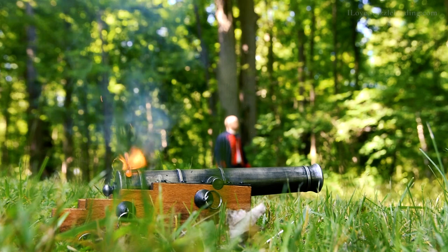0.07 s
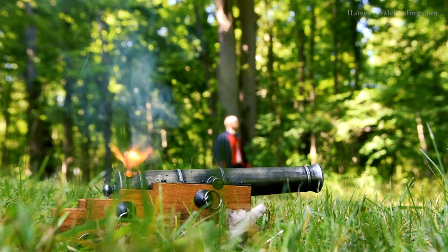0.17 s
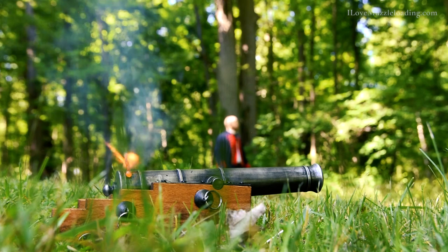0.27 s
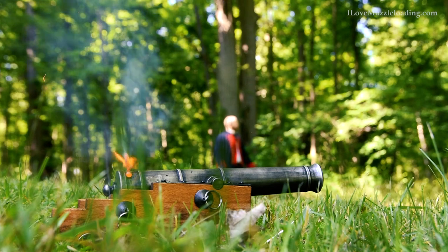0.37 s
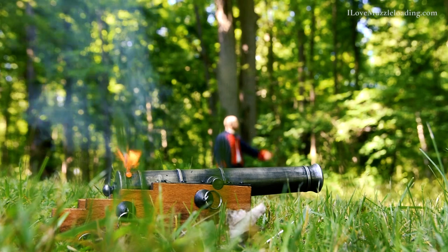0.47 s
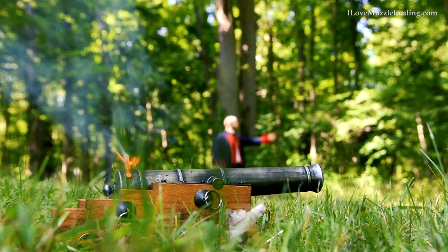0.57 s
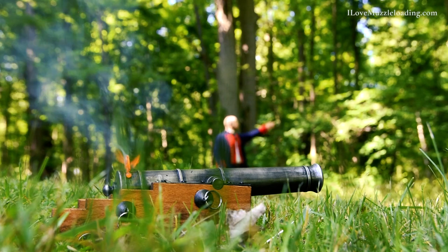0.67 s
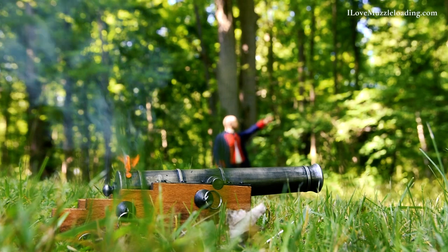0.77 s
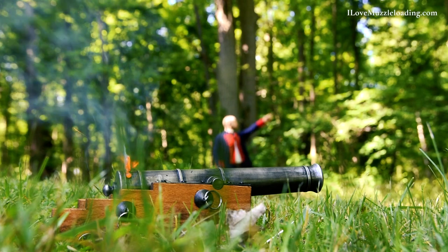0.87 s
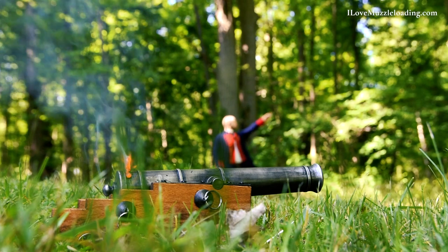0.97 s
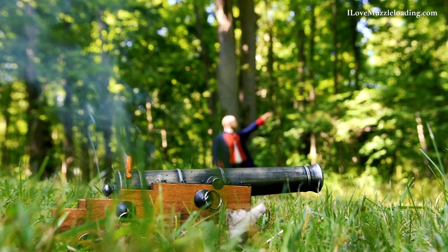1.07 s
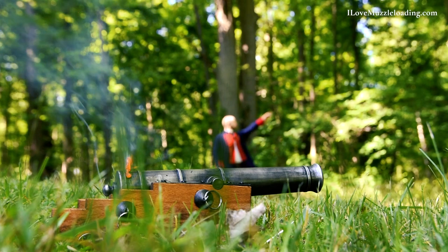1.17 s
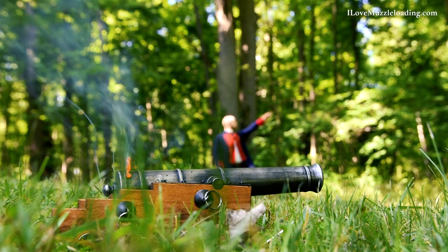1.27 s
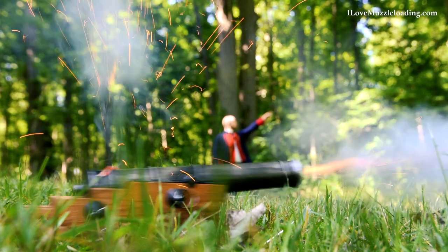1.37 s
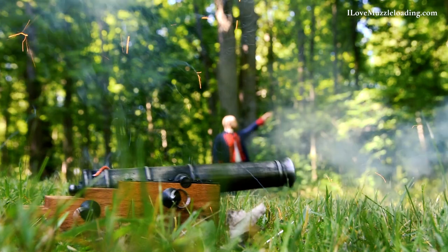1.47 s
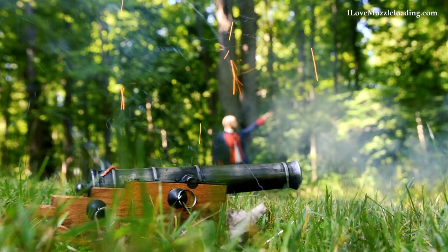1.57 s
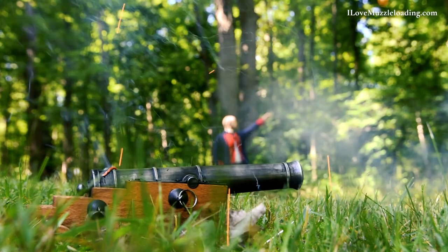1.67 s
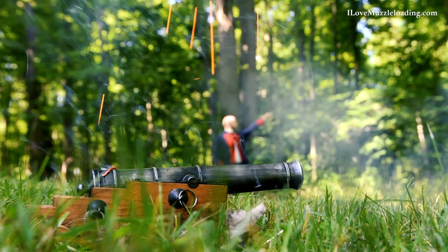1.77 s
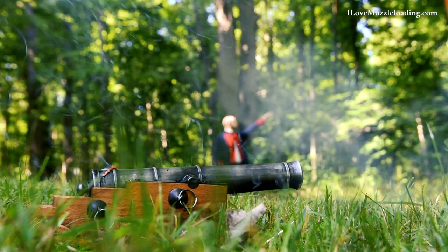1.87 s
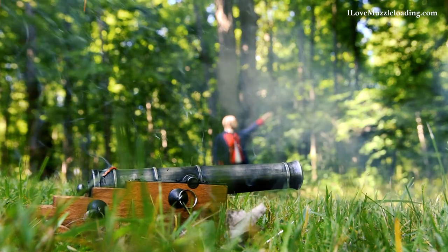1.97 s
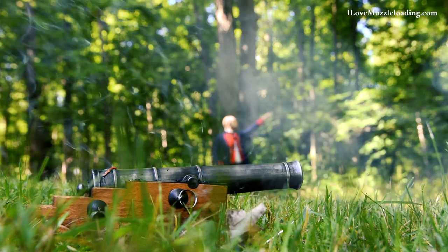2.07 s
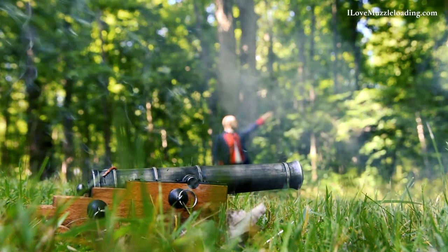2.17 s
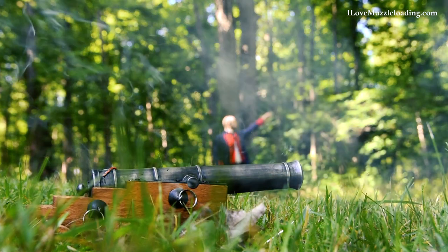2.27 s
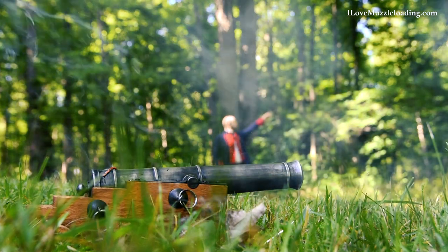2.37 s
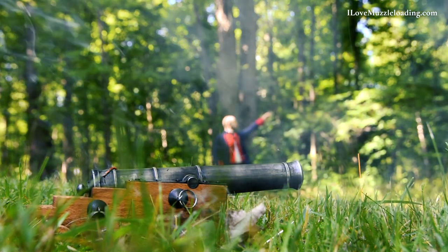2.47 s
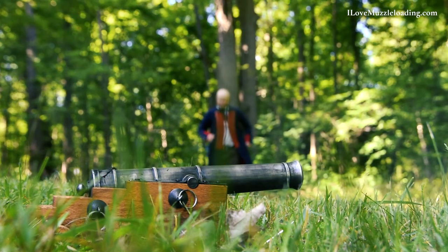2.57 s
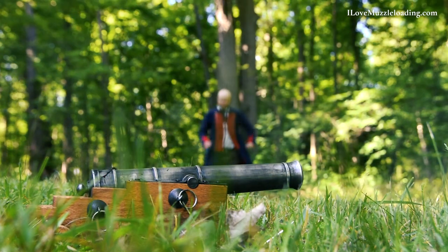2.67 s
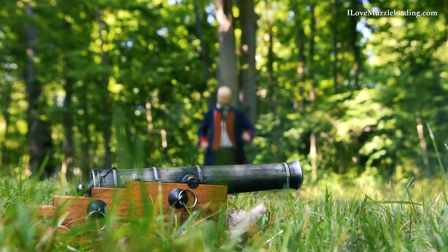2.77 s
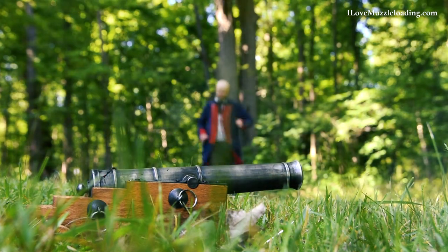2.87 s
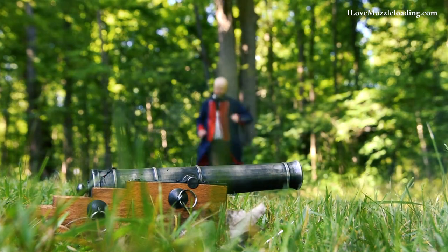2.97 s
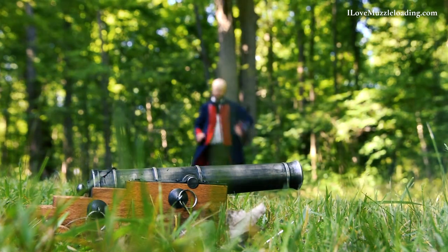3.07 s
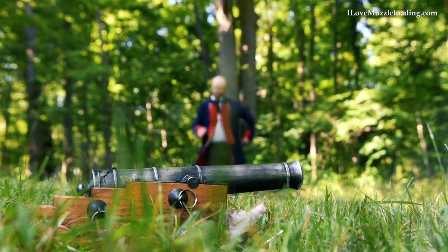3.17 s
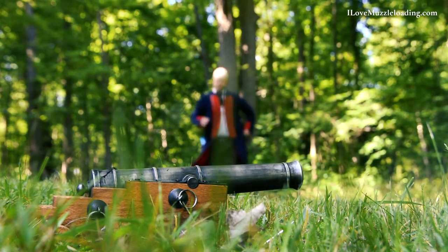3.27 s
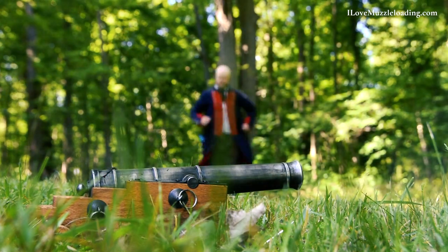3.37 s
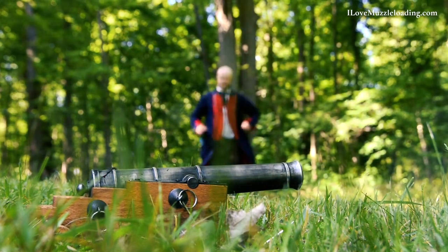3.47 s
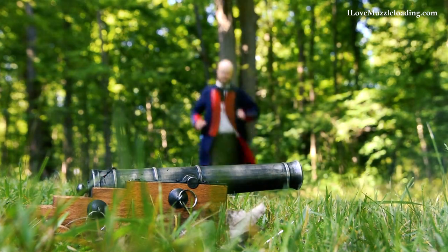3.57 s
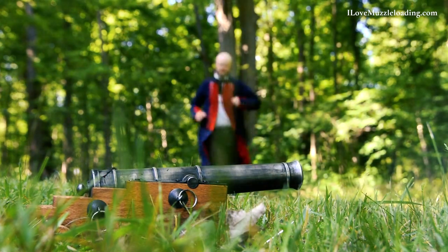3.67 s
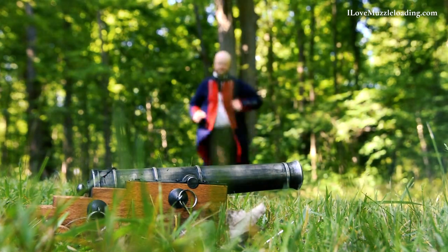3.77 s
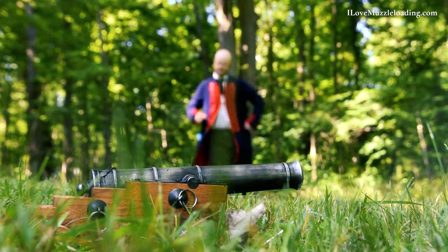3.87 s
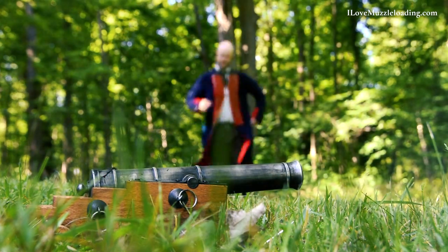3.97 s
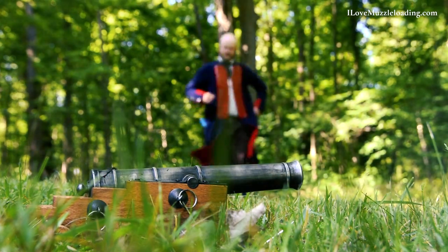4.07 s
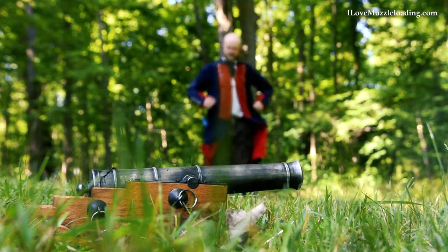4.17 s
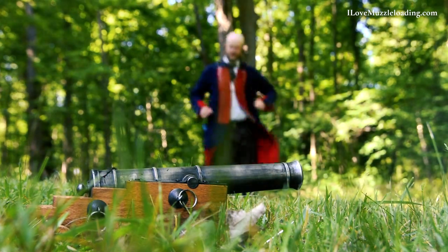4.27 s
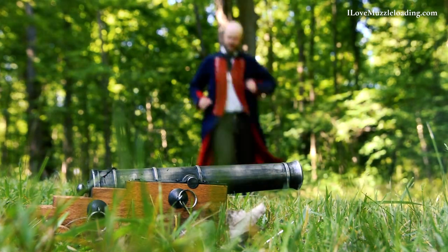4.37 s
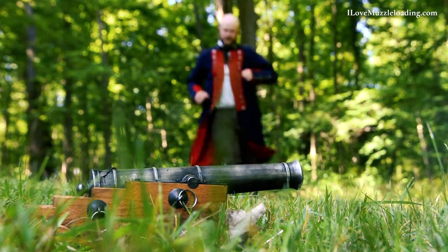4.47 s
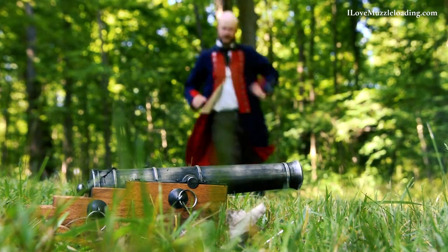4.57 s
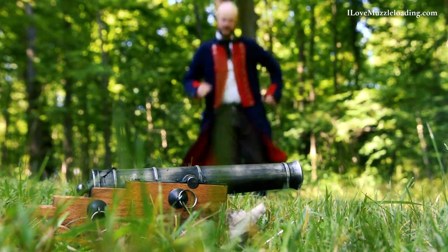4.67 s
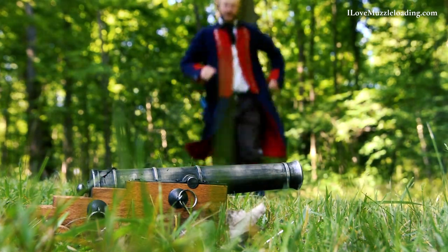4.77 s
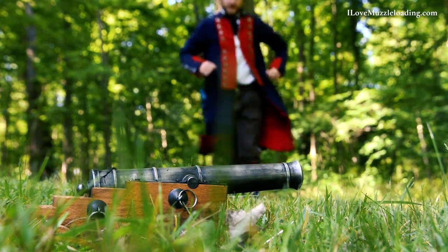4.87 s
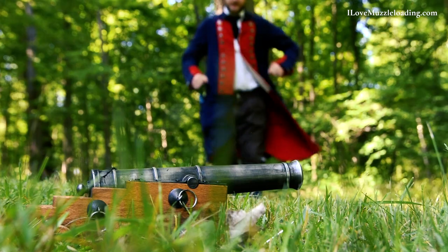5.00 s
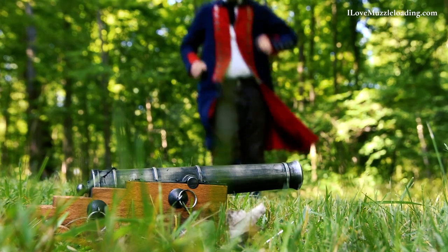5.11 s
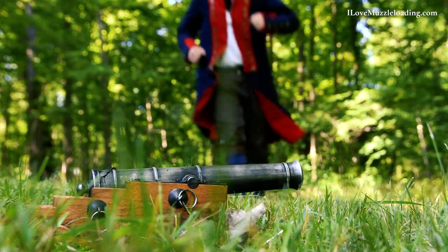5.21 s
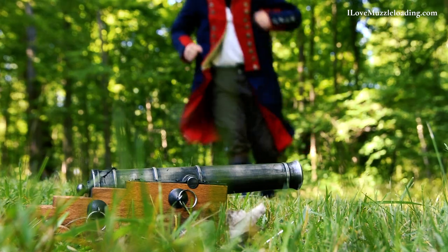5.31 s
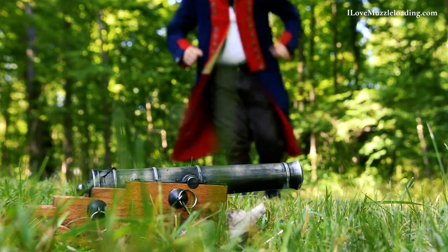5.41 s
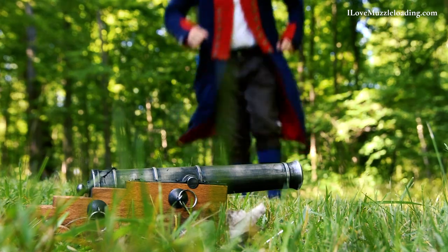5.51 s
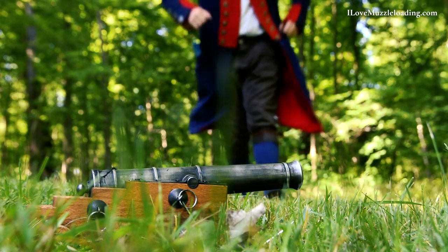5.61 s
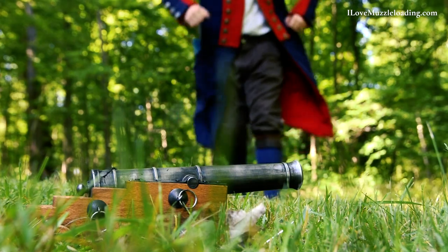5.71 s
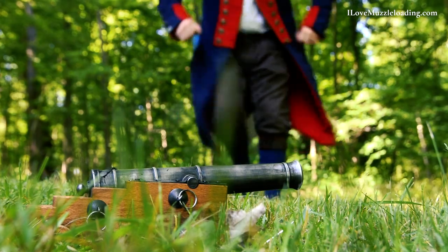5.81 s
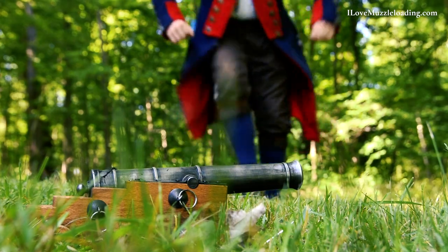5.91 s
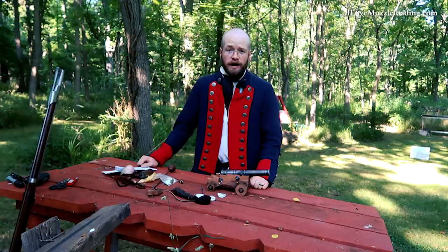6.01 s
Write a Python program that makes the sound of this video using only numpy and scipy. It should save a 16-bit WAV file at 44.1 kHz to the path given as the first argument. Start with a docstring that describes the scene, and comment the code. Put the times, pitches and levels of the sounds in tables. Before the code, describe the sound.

A small cannon fires one sharp overloading blast at a wood's edge, a fainter distant strike echoes, then someone jogs closer through rustling grass.

```python
"""A small black-powder cannon fires at the edge of a wood: pressure jumps and first sharp echoes that ring out, then
banded noise dying among the trunks. The ball strikes far off: a second noise echo, ringing with the target's modes.
The gunner stirs, then jogs through grass: pulsed resonances thud, grainy noise rustles and swishes, and noise
bursts through resonances snap like twigs. Birds sing in gliding sines over the coloured noise of the quiet wood."""
import sys
import numpy as np
from scipy import signal
from scipy.io import wavfile

SR = 44100
rng = np.random.default_rng(int(sys.argv[2]) if len(sys.argv) > 2 else 0)


def persist_wave(psi):
    """Save psi, clipped to +-1, as 16-bit WAV."""
    counts = np.round(np.clip(psi, -1, 1) * 32767).astype(np.int16)
    wavfile.write(sys.argv[1], SR, np.atleast_2d(counts).T)


N = 266672

# Spectrum of the wood at rest. Each row: frequency in Hz, relative density in dB per Hz.
AIR_SPECTRUM = [(26, -39), (45, -7), (153, 1), (242, -8), (950, -12.5), (1910, -18), (4020, -20.5),
                (4420, -24.5), (9310, -32), (14000, -48)]
AIR_DB = -75.5   # rms level before the final filters

# Bird notes sliding to a held pitch. Each row: start in seconds, length in seconds, first pitch in Hz,
# held pitch in Hz, slide in seconds, starting rms level in dB before wavering, fade over the note in dB.
WHISTLES = [(.06, 0.041, 2380, 2400, .04, -78, 5), (.11, .04, 1880, 1920, .04, -85, 2),
            (.15, .32, 2150, 2480, .04, -81.5, 10), (.3, .035, 1850, 2030, 0.023, -80, 3),
            (.55, 0.17, 2950, 2410, .09, -79.5, 0), (.84, 0.12, 2480, 2190, .05, -78.5, 7),
            (.95, .03, 2200, 2410, .025, -82, 1), (1.01, 0.081, 2240, 2260, .05, -81, -2),
            (1.085, 0.088, 2930, 2350, .05, -78.5, 2), (1.05, 0.19, 3750, 4080, .03, -86, 6),
            (1.24, .05, 2750, 2760, .04, -83, 6), (1.25, 0.059, 5100, 4300, 0.068, -82, 2),
            (1.368, 0.04, 4350, 3250, .022, -82, -9), (1.225, .025, 3900, 5000, .025, -85, 0),
            (2.09, .31, 4350, 4430, 0.062, -58.5, 26), (2.49, 0.089, 1900, 4390, .024, -66, -5),
            (2.545, .053, 4200, 4230, 0.029, -68, 2), (2.525, 0.027, 4350, 3500, 0.059, -62, 4),
            (3.99, .1, 3050, 3170, .02, -71.5, -1), (4.16, .03, 3100, 3340, .015, -70.5, 3.5),
            (4.54, 0.073, 2900, 3400, .06, -73, -3), (4.845, .06, 5300, 4600, .04, -73, 3.5),
            (4.975, 0.067, 3200, 3000, .1, -69, 0), (5.058, 0.027, 4720, 7550, .03, -55.5, 6),
            (5.09, .21, 4300, 4234, 0.052, -61.5, 22), (5.21, 0.054, 2480, 2600, .03, -72, -1),
            (5.3, 0.061, 2740, 3100, 0.034, -70.5, 0.5), (5.54, .105, 2790, 3400, .022, -72.5, -3)]
# Buzzy bird notes, rough in pitch. Each row: the same columns as the whistles.
BUZZES = [(2.488, 0.1, 4100, 7100, 0.028, -69.5, 8), (2.505, .093, 5500, 5900, .08, -71, 5),
          (5.09, .12, 7230, 7300, 0.087, -76, 20)]

# Spectra of cloth, crushed stalks and grass blades. Each row: frequency in Hz, relative density in dB per Hz.
CLOTH_SPECTRUM = [(15, -51), (25, -23.5), (86, 0.5), (179, 1), (422, -5.5), (515, -9), (628, -9),
                  (1300, -19.5), (1690, -46), (2860, -120)]
STALK_SPECTRUM = [(400, -18.5), (800, 0.5), (1300, -3), (2100, -5), (3500, -15), (7000, -37.5)]
GRASS_SPECTRUM = [(1060, -29.5), (1800, -1.5), (2490, -5.5), (2700, -2.5), (3980, -2.5), (4430, -5),
                  (5210, -4.5), (10700, -20.5), (15500, -41.5)]

# The gunner shifts and lifts an arm, then stands still.
# Each row: time in seconds, coat's dull rustle in dB, bright swish in dB.
STIR = [(.05, -85, -100), (.12, -73.5, -90), (.27, -70.5, -94), (.35, -79, -97), (.42, -60, -78.5),
        (.56, -67, -81), (.68, -60.5, -72.5), (.81, -54.5, -63.5), (.84, -60.5, -74.5), (.88, -59.5, -74),
        (.945, -81, -98), (.965, -65, -85), (1.06, -78, -100), (1.39, -78, -100)]
STIR_CRUNCH_DB = -12.5   # against the coat
# Steady rustle of the jog, from 2.59 s on
JOG_S, JOG_COAT_DB, JOG_CRUNCH_DB, JOG_SWISH_DB = 2.59, -59, -69.5, -73
# A leg sweeps or a toe drags through the grass.
# Each row: middle in seconds, length in seconds, swish in dB, coat in dB, crunch in dB.
SWINGS = [(2.595, 0.031, -73, -64, -75.5), (2.705, 0.028, -74, -66, -75), (3.056, 0.15, -70, -58.5, -80),
          (3.222, 0.07, -71, -64, -81), (3.407, 0.28, -68.5, -63, -78), (3.693, 0.057, -76, -67, -65),
          (3.789, 0.1, -67, -52, -68), (4.04, 0.032, -73, -60.5, -79), (4.219, 0.15, -74, -63.5, -83),
          (4.298, 0.068, -89, -66, -57), (4.399, 0.054, -74, -71, -61), (4.535, 0.15, -71.5, -53.5, -71),
          (4.634, 0.041, -71, -60, -60), (4.73, 0.025, -68.5, -69, -81), (4.987, 0.1, -69.5, -60, -81),
          (5.132, 0.037, -73, -64, -60.5), (5.504, 0.035, -66.5, -49.5, -75),
          (5.931, 0.14, -71.5, -60, -71)]
# Heel strikes. Each row: first touch in seconds, thud peak in dB, ground thud in Hz, roll to the main push
# in seconds, deep heave against the thud in dB, swish in dB, crunch in dB.
STEPS = [(2.774, -37, 77.6, .02, -1, -60.5, -62), (3.165, -38, 125.5, 0.017, -7, -54.5, -72),
         (3.574, -28, 70, .016, 2, -50.5, -58), (3.926, -38.5, 60, .021, -5.5, -56.5, -66),
         (4.336, -29, 102, .02, 1, -54, -54.5), (4.659, -34.5, 100, .023, -2, -58.5, -58.5),
         (5.075, -29, 101, .022, -2.5, -55.5, -56.5), (5.45, -38, 92, .022, -1, -54, -64),
         (5.844, -36, 141, .021, -5.5, -57, -64.5)]
FLATTEN_S, STEP_COAT_DB = 0.013, 7   # grass is loudest this long after first touch; coat against swish
# Seconds for 20 dB
SWISH_RISE_S, SWISH_FALL_S, CRUNCH_RISE_S, CRUNCH_FALL_S = 0.038, 0.035, 0.032, .12

# Twigs and stalks snapping. Each row: start in seconds, click peak in dB, ring in Hz,
# duller knock against the click in dB, decay constant of the fizz in milliseconds.
SNAPS = [(0.953, -66.5, 2300, 10.5, 1.5), (2.698, -52, 1200, 7.5, 1.6), (2.780, -45, 1000, -12, 1.8),
         (3.007, -61, 1000, 15, 1.8), (3.172, -43.5, 3130, -29, 11), (3.577, -31.5, 2700, -9.5, .7),
         (3.628, -41.5, 1200, -15, 6.9), (3.676, -47, 1480, 1.5, 2), (3.7005, -49, 1450, -15, 1.5),
         (3.9287, -48, 2010, 7, 2.05), (4.211, -50.5, 1300, -2, 1), (4.305, -45, 1510, -14, 3.1),
         (4.3393, -29, 2630, -17, 0.77), (4.408, -41.5, 1200, -15, .6), (4.6224, -46, 1710, 0, 3.3),
         (5.032, -41.5, 1400, 3.5, 1), (5.08, -30.5, 2750, -17, 0.51), (5.128, -43, 1300, -8, 4.5),
         (5.3702, -50.5, 2380, 4, 2.3), (5.439, -50, 3720, 3, 6.4), (5.6678, -35.5, 2260, -3, 0.62),
         (5.7575, -51, 1790, -13.5, 1.1), (5.851, -41.5, 2560, -7, .8), (5.8643, -49.5, 1700, 4, 2.1)]

REPORT_S, STRIKE_S = 1.4455, 1.8478   # starts of the two echoes
# Echo of the report in the wood. Each row: frequency in Hz, early level in dB per Hz, early t60 in seconds,
# late level against early in dB, late t60 in seconds.
REPORT_ECHO = [(30, -75.5, .1, -11, .7), (70, -57.5, .1, -12, 1.4), (150, -54, 0.11, -9, 1.1),
               (280, -59, 0.36, -8.5, 1.4), (574, -53, 0.67, -10, 2.62), (1000, -60, 0.41, -10.5, 2),
               (2200, -65.5, 0.69, -13.5, 2), (4500, -59, 0.57, -21.5, 1.6), (7340, -65, 0.46, -19.5, 1.3),
               (11000, -78.5, 0.41, -20, 0.85), (16060, -103, .2, -27, .4)]
# Echo of the ball's strike. Each row: the same columns as the report's echo.
STRIKE_ECHO = [(299, -88, 0.26, -19, 1.8), (540, -57, 0.11, -18, 1.9), (793, -53, 0.17, -20, 1.37),
               (1300, -69.5, 0.32, -13.5, 1.7), (2100, -62.5, 0.19, -13.5, 1.24),
               (2900, -63.5, 0.18, -12.5, 1.32), (4000, -76, 0.24, -2, 1.06), (5860, -66, 0.5, -13.5, 1.2),
               (7300, -73.5, 0.41, -15, 1.1), (9040, -81, 0.38, -13.5, 0.85),
               (16000, -100, 0.22, -12, 0.44)]
# Modes of the struck target. Each row: frequency in Hz, width in Hz, gain in dB, t60 of that gain in seconds.
STRIKE_MODES = [(797, 100, 2, 1.4), (1630, 150, 2, 4), (2880, 110, 10, 1.24)]

# Powder gas spitting from the vent before the blast: start, level at the blast before resonances, rise
VENT_S, VENT_DB, VENT_RISE_DB = 1.4365, -10, 25.5
# Pressure jumps of the muzzle blast and its first sharp echoes. Each row: start in seconds,
# peak in dB before dulling, ring in Hz, t60 in seconds, low-pass corner in Hz.
BLAST = [(1.4415, -17, 484, 0.0078, 2007), (1.4432, 14.5, 403, 0.0051, 6970),
         (1.4455, -6, 140, 0.028, 1500), (1.4534, -6.5, 602.4, 0.012, 3010),
         (1.4551, -8, 555.5, 0.01, 3013)]
# Dull echoes off near trunks. Each row: start in seconds, peak in dB before dulling.
SLAPS = [(1.4685, -22), (1.482, -14.5), (1.496, -18), (1.522, -23), (1.548, -19), (1.571, -26),
         (1.62, -17.5), (1.645, -29)]
SLAP_HZ, SLAP_T60_S, SLAP_DULL_HZ = 564, .018, 1400

START_S = .05   # silence until here
CLIP_TOP = 0.66   # largest amplitude the input passes
CUTOFF_HZ = 16000   # top of the treble


def amp(db):
    """Logarithmic level: decibels to amplitude gain."""
    return 10 ** (np.asarray(db) / 20)


def rms_one(x):
    """Normalised power: scale to rms 1."""
    return x / np.sqrt(np.mean(x ** 2) + 1e-20)


def at_hz(table, hz):
    """Interpolation on a logarithmic frequency axis: every further column of a table at one frequency."""
    f, *columns = np.transpose(table)
    return [np.interp(np.log(hz), np.log(f), c) for c in columns]


def drift(rate):
    """Low-passed chance: noise through a double pole at rate Hz, made every 20 samples, of spread 1."""
    r = np.exp(-40 * np.pi * rate / SR)
    noise = rng.standard_normal(N // 20 + 2002)
    slow = signal.lfilter([1], [1, -2 * r, r * r], noise)[2000:]   # drop the settling
    return np.interp(np.arange(N) / 20, np.arange(len(slow)), rms_one(slow))


def bands(source, step):
    """Filter bank: pairs (centre Hz, band), step octaves wide, dealing two sources in turn."""
    edges = 22 * 2 ** np.arange(0, 9.7, step)
    for k, (low, high) in enumerate(zip(edges, edges[1:])):
        band_pass = signal.butter(3, [low, high], "band", fs=SR, output="sos")
        yield np.sqrt(low * high), signal.sosfilt(band_pass, source[k % 2])


def ring(x, hz, width_hz):
    """Damped resonance: two poles, whose width sets the decay, with gain 1 on top."""
    r = np.exp(-np.pi * width_hz / SR)
    poles = [1, -2 * r * np.cos(2 * np.pi * hz / SR), r * r]
    return signal.lfilter([(1 - r * r) / 2, 0, (r * r - 1) / 2], poles, x)


def add(out, s, x):
    """Superposition: mix x into out at time s."""
    i = round(s * SR)
    out[i:i + len(x)] += x[:N - i]


def peaks(s, db, rise_s, fall_s):
    """Exponential rise and decay: the largest gain of peaks at times s, 20 dB in each span."""
    since = np.arange(N) / SR - np.array(s)[:, None]
    fall_db = 20 * np.maximum(-since / rise_s, since / fall_s)
    return amp(np.array(db)[:, None] - fall_db).max(axis=0)


def grainy(spectrum, per_s, spread_db, patchy_db):
    """Shot noise on steady noise: clicks of uneven size, coloured in flickering bands; rms 1."""
    sizes = amp(spread_db * np.minimum(rng.exponential(1, (2, N)), 4))
    grains = (rng.random((2, N)) < per_s / SR) * sizes
    source = rng.standard_normal((2, N)) * (1 + grains)
    together = drift(11)   # flicker common to all bands
    total = np.zeros(N)
    for hz, band in bands(source, step=.5):
        flicker_db = patchy_db * (together + drift(14))
        total += band * amp(at_hz(spectrum, hz)[0] + flicker_db)
    return rms_one(total)


def air():
    """Broadband ambience: noise shaped by the spectrum of the resting wood, its bands flickering."""
    return amp(AIR_DB) * grainy(AIR_SPECTRUM, 0, spread_db=0, patchy_db=3.0)


def sing(notes, waver_hz):
    """Frequency modulation: soft-ended sines ease into their held pitch and tremble by chance."""
    out, tremble = np.zeros(N), waver_hz * drift(250)
    for s, length, first_hz, held_hz, slide, db, fade_db in notes:
        t = np.arange(0, length, 1 / SR)
        ends = np.clip(np.minimum(t, length - t) / 0.0074, 0, 1)
        glide = np.sin(np.pi / 2 * np.minimum(t / slide, 1))
        pitch = first_hz + (held_hz - first_hz) * glide + tremble[((s + t) * SR).astype(int)]
        tone = np.sqrt(2) * np.sin(2 * np.pi * np.cumsum(pitch) / SR)
        add(out, s, ends * amp(db - fade_db * t / length) * tone)
    return out


def birds():
    """Diffuse reverberation: whistles and buzzes, wavering in level, blurred by an echo from the trees."""
    notes = sing(WHISTLES, waver_hz=42) + sing(BUZZES, waver_hz=260)
    notes = notes * amp(3.0 * drift(40))
    trees = rng.standard_normal(SR // 3) * amp(-38 - 180 * np.arange(SR // 3) / SR)
    return notes + signal.fftconvolve(notes, trees)[:N]


def rustle():
    """Friction noise: cloth rubs dully, stalks crunch, blades hiss and tick with stirs, leg sweeps and footfalls."""
    t = np.arange(N) / SR
    jog = t > JOG_S
    s, coat_db, swish_db = np.transpose(STIR)
    coat_db, swish_db = np.interp(t, s, coat_db), np.interp(t, s, swish_db)

    bright, dull, crunch = np.zeros((3, N))
    for s, length, sweep_db, sweep_coat_db, drag_db in SWINGS:
        arch = np.cos(np.pi * np.clip((t - s) / length, -.5, .5))
        bright += amp(sweep_db) * arch
        dull += amp(sweep_coat_db) * arch
        crunch += amp(drag_db) * arch

    s, *_, tread_db, crush_db = np.transpose(STEPS)
    tread = peaks(s + FLATTEN_S, tread_db, SWISH_RISE_S, SWISH_FALL_S)
    crush = peaks(s + FLATTEN_S, crush_db, CRUNCH_RISE_S, CRUNCH_FALL_S)
    dull += amp(np.where(jog, JOG_COAT_DB, coat_db)) + amp(STEP_COAT_DB) * tread
    crunch += amp(np.where(jog, JOG_CRUNCH_DB, coat_db + STIR_CRUNCH_DB)) + crush
    bright += amp(np.where(jog, JOG_SWISH_DB, swish_db)) + tread

    cloth = dull * grainy(CLOTH_SPECTRUM, 170, spread_db=-1.5, patchy_db=1.98)
    stalks = crunch * grainy(STALK_SPECTRUM, 150, spread_db=7.0, patchy_db=2.05)
    grass = bright * grainy(GRASS_SPECTRUM, 600, spread_db=5, patchy_db=1.37)
    return cloth + stalks + grass


def snaps():
    """Impulse excitation: a click with a short fizz rings a broad resonance; a duller knock follows."""
    out, t = np.zeros(N), np.arange(1200) / SR
    for s, db, hz, knock_db, ms in SNAPS:
        noise = rng.standard_normal(1200)
        burst = (noise + (t == 0) * 2.2 / ms) * np.exp(-t * 1000 / ms)
        tick = ring(ring(ring(burst, hz, 0.58 * hz), hz, 0.91 * hz), hz, 1.6 * hz)
        knock = ring(ring(noise * t * np.exp(-t / 0.0033), 290, 300), 395, 500)
        add(out, s, amp(db) * tick / np.abs(tick).max())
        add(out, s, amp(db + knock_db) * knock / np.abs(knock).max())
    return out


def steps():
    """Forced vibration: soft pushes of the rolling foot lead to the main one; the turf shakes and heaves."""
    out, n = np.zeros(N), round(.15 * SR)
    for s, db, hz, roll, heave_db, *_ in STEPS:
        main = np.arange(n) == round(roll * SR)
        pushes = np.zeros(n)
        places = (rng.random(5) * roll * SR).astype(int)
        pushes[places] = (0.34 + .5 * rng.random(5)) * [1, -1, 1, -1, -1]
        pushes = signal.lfilter(*signal.butter(2, 420, fs=SR), pushes + main)   # grass cushions the contact
        thud = ring(ring(pushes, hz, 1.05 * hz), hz, 1.45 * hz)
        thud += 0.36 * ring(ring(pushes, 151, 180), 204, 260)
        heave = ring(signal.lfilter(*signal.butter(2, 110, fs=SR), main), 56.5, 39)
        add(out, s, amp(db) * (thud / np.abs(thud).max() + amp(heave_db) * heave / np.abs(heave).max()))
    return out


def wood_echo(s, table, lumpy_db, gather_s):
    """Multiple scattering: trunk echoes gather and merge to noise; each band dies fast, then slowly."""
    out, t = np.zeros(N), np.arange(2 * SR) / SR
    white = rng.standard_normal((2, len(t))) * np.sqrt(SR / 2)   # 0 dB per Hz
    white *= amp(lumpy_db * drift(60)[:len(t)])
    for hz, band in bands(white, step=1 / 5):
        db, early, late_db, late = at_hz(table, hz)
        db -= 24 * max(np.log2(table[0][0] / hz), 0)   # 24 dB per octave below the first row
        gather = np.minimum(t / (2 / hz + gather_s), 1)
        decay = amp(db - 60 * t / early) + amp(db + late_db - 60 * t / late)
        add(out, s, band * gather * decay)
    return out


def strike():
    """Modal resonance: the ball's hit and its first echoes carry the ring of the target."""
    echo = wood_echo(STRIKE_S, STRIKE_ECHO, lumpy_db=1.06, gather_s=.0004)
    since = np.maximum(np.arange(N) / SR - STRIKE_S, 0)
    out = echo.copy()
    for hz, width_hz, db, t60 in STRIKE_MODES:
        out += amp(db - 60 * since / t60) * ring(echo, hz, width_hz)
    return out


def report_echo():
    """Reverberant decay: the report of the cannon dies among the trunks."""
    return wood_echo(REPORT_S, REPORT_ECHO, lumpy_db=1.0, gather_s=0.0098)


def blast():
    """Sudden gas expansion: vent hiss swells to the blast; ringing pressure jumps, sharp and dull echoes follow."""
    out, t = np.zeros(N), np.arange(round(.03 * SR)) / SR
    late = t - (BLAST[1][0] - VENT_S)   # time from the main jump
    swell_db = np.where(late < 0, -VENT_RISE_DB * (late / late[0]) ** 2, -1600 * late)
    hiss = ring(ring(rng.standard_normal(len(t)), 5500, 7000), 4500, 11000)
    add(out, VENT_S, hiss * amp(VENT_DB + swell_db))
    slaps = [(s, db, SLAP_HZ, SLAP_T60_S, SLAP_DULL_HZ) for s, db in SLAPS]
    for s, db, hz, t60, dull_hz in list(BLAST) + slaps:
        pulse = np.cos(2 * np.pi * hz * t) * amp(db - 60 * t / t60)
        add(out, s, signal.lfilter(*signal.butter(1, dull_hz, fs=SR), pulse))
    return out


def scene():
    """Linear superposition: all sources over the quiet of the wood, in one channel."""
    gunner = rustle() + steps() + snaps()
    bangs = strike() + report_echo() + blast()
    return (air() + birds() + gunner + bangs)[None]


def record(dry):
    """Saturation: the blast overloads the input, whose coupling lets flat tops sag; the top treble is cut."""
    wet = CLIP_TOP * np.tanh((np.abs(dry) / CLIP_TOP) ** 3) ** (1 / 3) * np.sign(dry)
    wet = signal.sosfilt(signal.butter(1, 25, "high", fs=SR, output="sos"), wet)
    wet = wet * np.clip((np.arange(N) / SR - START_S) / 0.0091, 0, 1)   # short fade-in
    return signal.sosfilt(signal.cheby2(10, 60, CUTOFF_HZ + 800, fs=SR, output="sos"), wet)


dry = scene()
out = record(dry)
persist_wave(out)
```